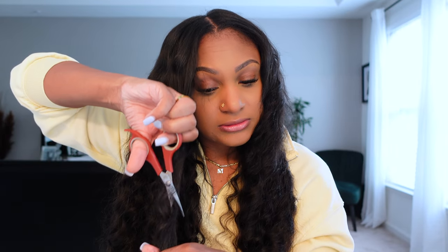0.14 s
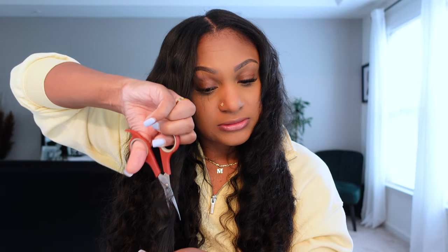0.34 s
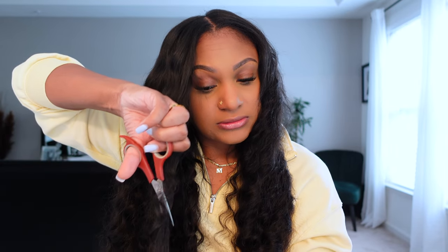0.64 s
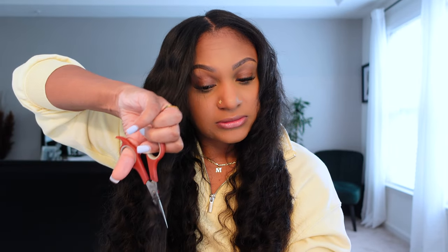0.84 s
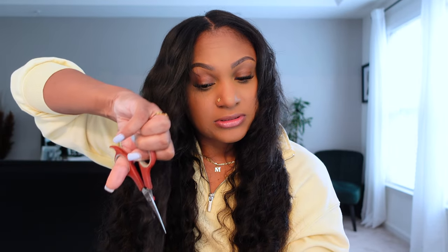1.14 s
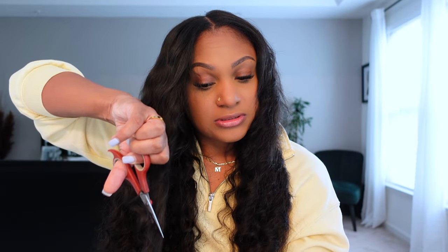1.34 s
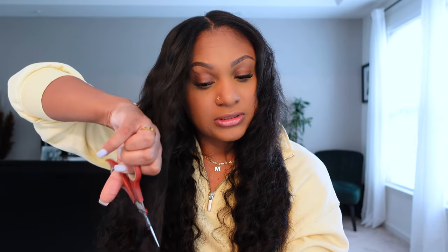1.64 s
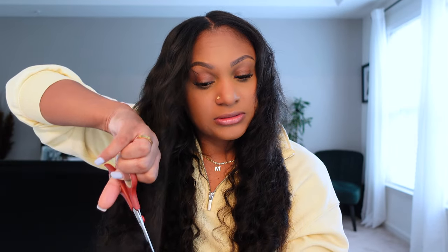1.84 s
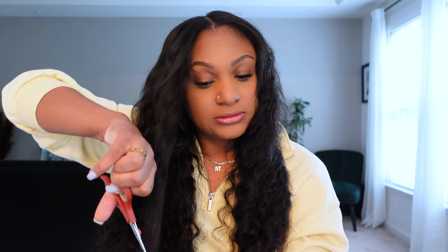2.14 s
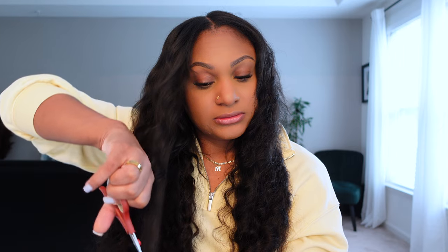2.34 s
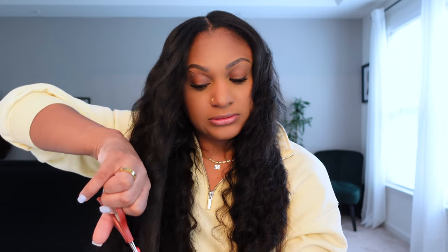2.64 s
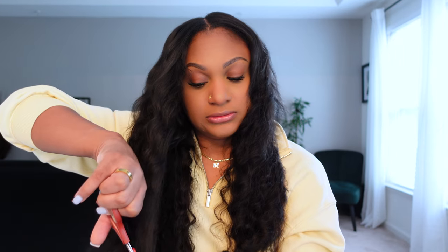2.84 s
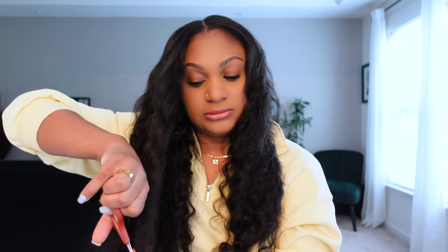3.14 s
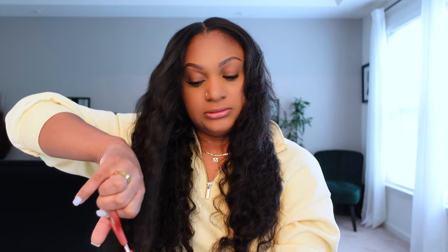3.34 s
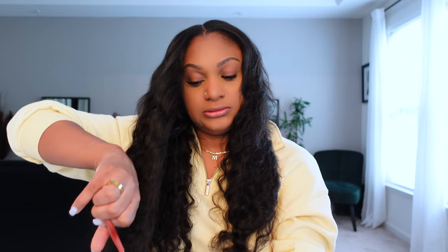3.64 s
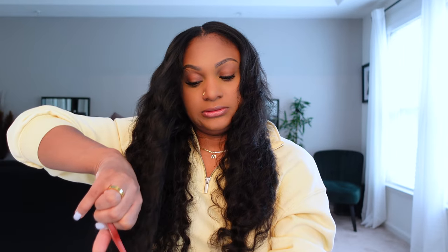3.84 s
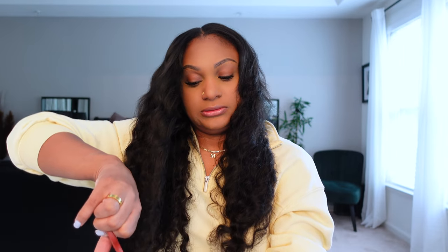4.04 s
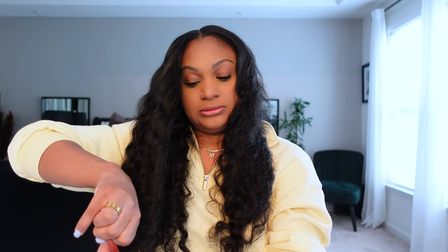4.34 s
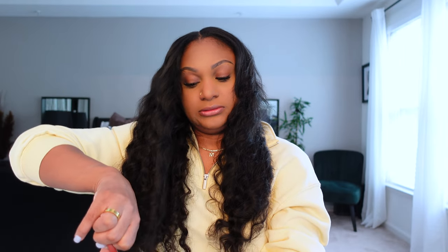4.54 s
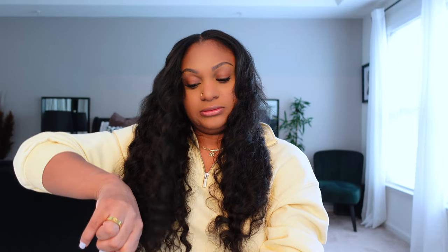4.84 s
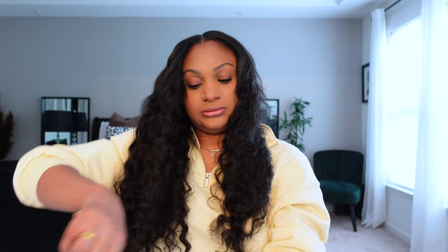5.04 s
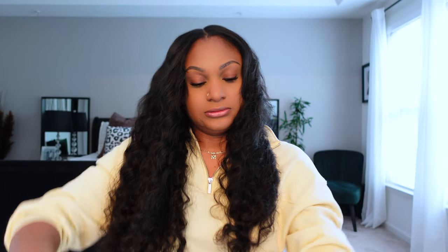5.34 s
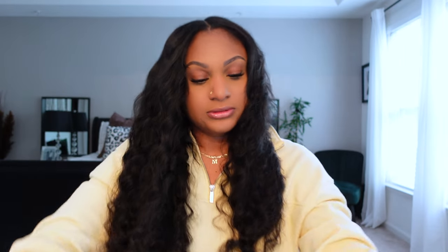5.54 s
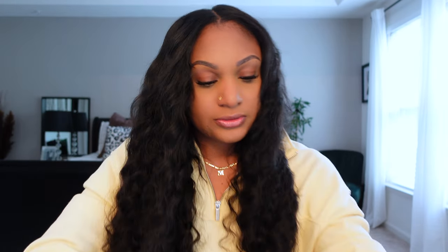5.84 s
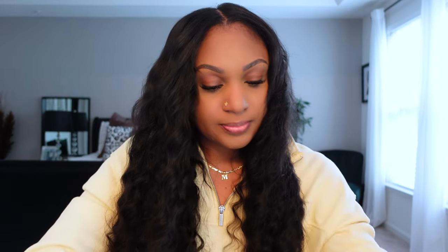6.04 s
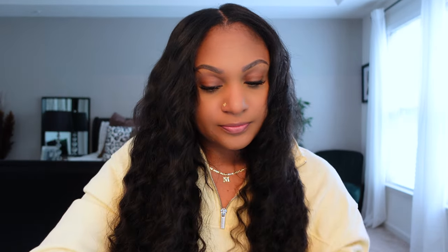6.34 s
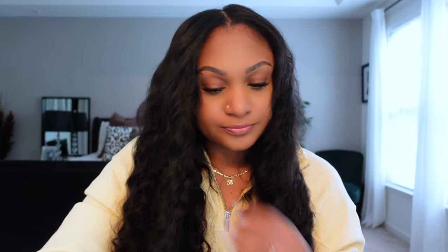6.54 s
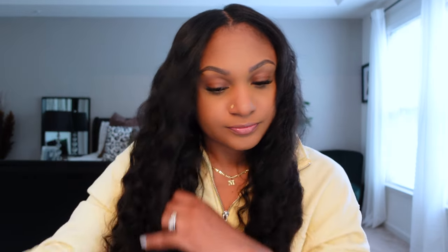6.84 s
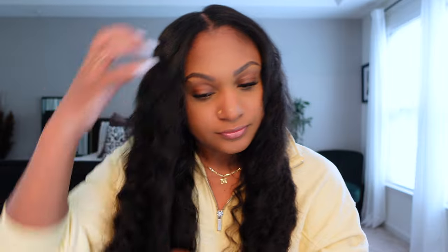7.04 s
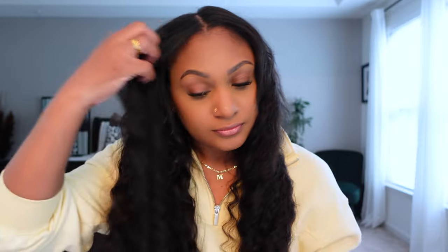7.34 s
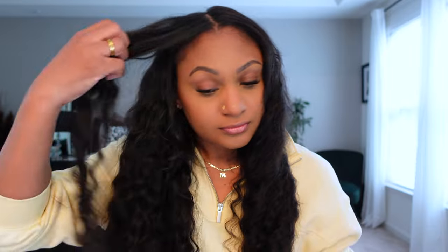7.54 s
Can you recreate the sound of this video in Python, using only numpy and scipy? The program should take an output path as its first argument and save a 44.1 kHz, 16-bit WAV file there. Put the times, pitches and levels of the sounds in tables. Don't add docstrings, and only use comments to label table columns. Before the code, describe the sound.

In a quiet, bare-walled bedroom, small scissors close about four times a second through long hair, each stroke a faint, crisp, crackling snip with thin metallic ring. After about five seconds they stop. A plastic thing scrapes over a desk, pauses, rattles in growing knocks and lands with a hard, loud clack and bounce. The camera microphone hears soft room air and hiss, with a short room ring afterwards.

```python
import sys
import numpy as np
from scipy import signal
from scipy.fft import rfft, irfft, next_fast_len
from scipy.io import wavfile
from scipy.ndimage import uniform_filter1d

SR = 44100
rng = np.random.default_rng(int(sys.argv[2]) if len(sys.argv) > 2 else 0)


def put_to_file(sound):
    columns = np.atleast_2d(sound).T
    safe = np.clip(columns, -1, 1)
    whole_steps = np.round(safe * 32767)
    wavfile.write(sys.argv[1], SR, whole_steps.astype(np.int16))


def magnitude_from_level(level_db):
    exponent = np.asarray(level_db, float) / 20
    return 10 ** exponent


N = 340011


def on_log(points, hz):
    f, v = np.transpose(points)
    return np.interp(np.log(np.maximum(hz, 1)), np.log(f), v)


def level(x, db):
    return x * magnitude_from_level(db) / np.sqrt(np.mean(x ** 2))


def add(out, start_s, sound):
    i = int(start_s * SR)
    out[i:i + len(sound)] += sound[:N - i]


def wander(per_s):
    return np.interp(np.arange(N) / SR * per_s, np.arange(100), rng.standard_normal(100))


def ring(x, modes, patchy_db, per_s):
    total = 0
    for k, (hz, width, db) in enumerate(modes):
        mode = signal.lfilter(*signal.iirpeak(hz, hz / width, SR), x)
        total = total + (-1) ** k * magnitude_from_level(db + patchy_db * wander(per_s)) * mode
    return level(total, 0)


def crackle(per_s, spread_db):
    size = magnitude_from_level(spread_db * rng.exponential(1, N).clip(0, 2))
    return (rng.random(N) < per_s / SR) * rng.choice([-1, 1], N) * size


def rattle(t, contact):
    blow = rng.standard_normal(len(t))
    for _ in range(8):
        spectrum = rfft(np.sign(blow) * np.sqrt(np.abs(blow)) * np.exp(-t / contact / 2))
        blow = irfft(spectrum / np.abs(spectrum))
    return blow * (t < 5 * contact)


def causal(db):
    cep = irfft(db * np.log(10) / 20)
    cep[1:len(cep) // 2] *= 2
    cep[len(cep) // 2 + 1:] = 0
    return irfft(np.exp(rfft(cep)))


# pitch_hz, density_db (per Hz)
AIR_COLOUR = [(15, -69.5), (25, -45), (50, -12.5), (99, -5.5), (125, -0.5), (270, 0.5), (520, -2),
              (680, -2), (770, -0.5), (900, -4.5), (2000, -8.5), (4140, -16), (7110, -19.5), (16000, -25)]
# pitch_hz, side_minus_mid_db
AIR_WIDTH = [(60, 0.5), (110, -8), (200, -4), (380, -4.5), (700, -5), (1290, -4), (2380, -5), (4400, -5),
             (8120, -7.5), (15000, -6)]


def air():
    air_db, pan_db = -65.5, 0.5
    size = next_fast_len(N)
    hz = np.arange(size // 2 + 1) * SR / size
    mid, side = rfft(rng.standard_normal((2, size))) * magnitude_from_level(on_log(AIR_COLOUR, hz))
    scale = magnitude_from_level(air_db) / np.sqrt(np.mean(irfft(mid, size) ** 2))
    side = side * magnitude_from_level(on_log(AIR_WIDTH, hz))
    both = irfft(mid + side * np.array([[1], [-1]]), size)[:, :N]
    return scale * both * magnitude_from_level(np.array([[pan_db], [-pan_db]]) / 2)


# pitch_hz, t60_s
ROOM_DECAY = [(150, 0.5), (400, 0.46), (1000, 0.56), (3000, 0.52), (7000, 0.5), (13000, 0.35)]


def walls():
    fill_s, side_db = 0.0092, -9.5
    t = np.arange(SR) / SR
    hz = np.arange(SR // 2 + 1)
    white, tail = rfft(rng.standard_normal((2, SR))), 0
    for centre in 90 * 2 ** np.arange(0, 8, .5):
        octaves = np.log2(np.maximum(hz, 1) / centre)
        band = irfft(white * np.cos(np.pi * np.clip(octaves, -.5, .5)) ** 2)
        tail = tail + band * magnitude_from_level(-60 * t / on_log(ROOM_DECAY, centre))
    tail = tail * (1 - np.exp(-t / fill_s))
    mid, side = tail / np.sqrt(np.sum(tail[0] ** 2))
    return mid + magnitude_from_level(side_db) * side * np.array([[1], [-1]])


def room(sources):
    direct = sum(x * magnitude_from_level(np.array([[pan_db], [-pan_db]]) / 2) for x, wet_db, pan_db in sources)
    sent = sum(x * magnitude_from_level(wet_db) for x, wet_db, pan_db in sources)
    return direct + signal.fftconvolve(sent[None], walls(), axes=1)[:, :N]


def thud():
    start_s, level_db, pitch_hz, fade_s = 6.824, -69, 30, 0.012
    t = np.maximum(np.arange(N) / SR - start_s, 0)
    return magnitude_from_level(level_db) * np.sin(2 * np.pi * pitch_hz * t) * np.exp(-t / fade_s)


def knocks(table, slope, rings):
    out, hz, t = np.zeros(N), np.arange(1025) * SR / 2048, np.arange(1024) / SR
    colour = on_log(slope, hz)
    for f, width, db in rings:
        colour = colour + db / (1 + (2 * (hz - f) / width) ** 2)
    for start_s, peak_db, thud_db, edge_db, contact_s in table:
        bright_db = 0.55 * edge_db
        tilt = on_log([(900, thud_db), (1500, 0.005), (3200, 0.0054),
                       (5600, bright_db), (6600, bright_db), (9000, edge_db)], hz)
        knock = np.convolve(rattle(t, max(contact_s, .0005)), causal(colour + tilt))
        add(out, start_s, knock * magnitude_from_level(peak_db) / np.abs(knock).max())
    return out


# start_s, peak_db, thud_db, edge_db, contact_s
LIGHT_KNOCKS = [
    (5.763, -45, 23, 12, 0.0027),
    (6.448, -39, 4, -32, 0.0021),
    (6.55, -40, 12, -40, 0.0019),
    (6.559, -30, -3.5, -14, 0.0032),
    (6.697, -22.5, 1, 4, 0.0043),
]
LIGHT_ECHOES = [(6.729, -33, 0, 4, .003), (6.756, -30, -4, -6, .003)]
# pitch_hz, density_db (per Hz)
LIGHT_SLOPE = [(70, -36.5), (330, -11), (1250, -9), (1950, -10.5), (2900, -1), (3800, -9), (5000, -12),
               (6000, -7), (7000, -27), (7800, -34.5), (8500, -24.5), (9600, -36), (10700, -20.5),
               (13000, -40)]
# pitch_hz, width_hz, level_db
LIGHT_MODES = [(720, 180, 6.6), (1670, 180, 14.3), (2262, 130, 9.9), (2635, 80, 3.5), (3000, 120, 2.3),
               (4400, 150, 5.5)]


def light_knocks(table):
    return knocks(table, LIGHT_SLOPE, LIGHT_MODES)


# start_s, peak_db, thud_db, edge_db, contact_s
CLACK_BLOWS = [
    (6.8232, -17, 3, -3, .0012),
    (6.8254, -4.5, 0, 0, .0035),
    (6.879, -10, -2, 4, .003),
]
CLACK_WALLS = [(6.8415, -16, 0, 3, .002), (6.852, -19, 0, 6, .002), (6.905, -21, 0, 6, .002)]
# pitch_hz, density_db (per Hz)
CLACK_SLOPE = [(70, -44), (450, -14.5), (1100, -19.5), (1500, -7), (2000, -9.5), (2600, -1.5), (3150, -5),
               (3800, -14.5), (4500, -6), (6100, -11.5), (7500, -16.5), (8700, -24.5), (12500, -30.5),
               (16000, -48.5)]
# pitch_hz, width_hz, level_db
CLACK_MODES = [(1702, 90, 4.5), (2636, 36, 8.3), (2980, 50, 7), (3025, 45, 8.3), (4440, 200, 4.9),
               (5290, 80, 1.4)]


def clack(table):
    return knocks(table, CLACK_SLOPE, CLACK_MODES)


# start_s, pressure_db, lean_on_shell_db
DRAG_PATH = [(5.762, -49, -13.5), (5.79, -51.5, -8), (5.94, -56, 0), (6.0, -51.5, -5), (6.04, -65, 2),
             (6.13, -50, -4), (6.172, -53, 6.5), (6.215, -65, 1), (6.3, -80, -3)]
LAST_SCRAPE = [
    (6.3, -80, -3),
    (6.32, -54, -9.5),
    (6.368, -67, 11),
    (6.435, -77, -3),
]


def pressure():
    rim_db, squeak_db, fresh_db, fresh_fade_s = -5, -12, 21, 0.072
    t, gain = np.arange(N) / SR, 0
    fresh = fresh_db * np.exp(-np.maximum(t - DRAG_PATH[0][0], 0) / fresh_fade_s)
    for table in (DRAG_PATH, LAST_SCRAPE):
        s, db, lean = np.transpose(table)
        desk = np.interp(t, s, db, -200, -200)
        shell = desk + np.interp(t, s, lean)
        gain = gain + magnitude_from_level(np.array([shell, desk, shell + rim_db, shell + squeak_db + fresh]))
    return gain


# pitch_hz, width_hz, level_db
SHELL_MODES = [(3040, 120, 6), (2770, 200, -0.5), (3360, 300, -8)]
DESK_MODES = [(280, 95, -8.5), (388, 60, -3.5), (616, 64, 4.5), (807, 120, -1.5), (1270, 210, -12.5)]
RIM_MODES = [(4230, 220, -5.5), (3700, 300, -11.5)]
SQUEAK_MODES = [(5220, 220, 4), (5790, 350, 1.5)]


def drag():
    drive = level(crackle(per_s=540, spread_db=5.5), 0) + magnitude_from_level(-2) * rng.standard_normal(N)
    out = 0
    for gain, modes in zip(pressure(), (SHELL_MODES, DESK_MODES, RIM_MODES, SQUEAK_MODES)):
        out = out + magnitude_from_level(-6.0) * gain * ring(drive, modes, patchy_db=1.8, per_s=8)
    return signal.sosfilt(signal.butter(2, 210, "high", fs=SR, output="sos"), out)


# start_s, peak_db, pitch_hz
SINGLE_TICKS = [(.2084, -58, 9000), (.4569, -56, 10000), (.946, -60, 9050), (.9644, -57, 9000),
                (1.1994, -60, 7000), (1.2112, -54, 8000), (1.5334, -62, 4050), (1.88, -57, 5000),
                (2.0805, -46, 2310), (2.2997, -51, 6660), (2.5665, -57.5, 7000), (2.6685, -52, 4000),
                (2.7794, -65, 2540), (3.4392, -50, 6900), (3.7217, -52.5, 7160), (3.817, -60, 7850),
                (4.0094, -59, 5000), (4.3894, -54, 7600), (4.783, -47.5, 7500), (4.843, -53, 2450),
                (4.8702, -52, 4660), (4.872, -54, 3600), (4.8716, -62, 2500), (4.891, -55, 646),
                (3.5198, -51, 3620), (6.126, -48, 4300), (6.34, -58.5, 5330), (6.567, -62, 8900),
                (7.052, -46, 12000), (7.3744, -55, 6000)]


def ticks():
    out, t = np.zeros(N), np.arange(512) / SR
    for start_s, peak_db, pitch_hz in SINGLE_TICKS:
        peak = signal.iirpeak(pitch_hz, 1.8, SR)
        tick = signal.lfilter(*peak, signal.lfilter(*peak, rattle(t, contact=.0008)))
        add(out, start_s, tick * magnitude_from_level(peak_db) / np.abs(tick).max())
    return out


# bite_s, closing_s, level_db, thin_blade_ring_db, mid_blade_ring_db
CLOSING_STROKES = [(-.01, .056, -62, 3, -13), (.252, 0.033, -62.5, 8, -7), (.48, 0.032, -63, 4, -15),
                   (.735, 0.027, -65.5, 1.5, -8), (0.976, 0.048, -62.5, -5, -20),
                   (1.236, 0.059, -65, -4, -11), (1.545, 0.028, -60.5, -7.5, -18),
                   (1.822, 0.03, -56, -7, -6.5), (2.082, .024, -59, -9.5, -4),
                   (2.335, 0.028, -63.5, -11.5, -3.5), (2.61, 0.053, -65.5, -6.5, -4.5),
                   (2.912, .04, -60.5, -8, -3.5), (3.182, 0.048, -60.5, -6, -0.5),
                   (3.492, 0.038, -56.5, -11, -6), (3.765, 0.044, -61.5, -12.5, 1),
                   (4.069, 0.033, -61, -9, 0.5), (4.328, .036, -61.5, -12, -1),
                   (4.566, 0.049, -62, -16, 1.5), (4.8, 0.042, -71, -15, -2)]
BITE_LEVEL = [-4, -11, -3.5, -6]
LINGER_LEVEL = [0.1, 4, 1.5, 1.5]


def strokes():
    approach_s, shut_s, faint_db = 0.04, 0.04, -24
    t, gain = np.arange(N) / SR, 0
    for bite_s, closing_s, level_db, thin_db, mid_db in CLOSING_STROKES:
        times = bite_s + np.cumsum([-approach_s, approach_s, closing_s, shut_s])
        tip_db = -4.5 + .6 * thin_db
        parts = []
        for part_db, bite, linger in zip((0, mid_db, thin_db, tip_db), BITE_LEVEL, LINGER_LEVEL):
            course = level_db + part_db + np.array([faint_db, bite, 0, faint_db + linger])
            parts.append(np.interp(t, times, course, -200, -200))
        gain = gain + magnitude_from_level(parts)
    return gain


# pitch_hz, width_hz, level_db
BLADE_BODY = [(1670, 530, -5.5), (2250, 280, -1.5), (3380, 1070, -0.5), (4083, 480, 3.5), (5530, 540, -15)]
BLADE_MIDDLE = [(6340, 610, -6), (6920, 650, -1), (7500, 450, -2)]
BLADE_EDGE = [(9530, 480, -2), (10000, 550, 0), (10820, 740, 1), (11350, 570, 0.4), (12000, 780, -4)]
BLADE_TIP = [(12460, 760, 2), (13400, 600, 4), (13900, 800, 5), (14700, 800, -20)]


def scissors():
    shared, out = crackle(per_s=700, spread_db=6), 0
    for gain, modes in zip(strokes(), (BLADE_BODY, BLADE_MIDDLE, BLADE_EDGE, BLADE_TIP)):
        snaps = level(shared + crackle(per_s=900, spread_db=5), 0)
        drive = snaps + magnitude_from_level(-6) * rng.standard_normal(N)
        out = out + magnitude_from_level(0.5) * gain * ring(drive, modes, patchy_db=2.5, per_s=6.945)
    span = int(.007 * SR)
    density = uniform_filter1d(uniform_filter1d(np.abs(shared), span), span)
    return out * level((density + 0.0017) ** .3, 0) + ticks()


def scene():
    echoes = light_knocks(LIGHT_ECHOES) + clack(CLACK_WALLS)
    sources = [(scissors(), -12, .8), (drag(), -1.5, 1.8),
               (light_knocks(LIGHT_KNOCKS), 2.5, .4), (clack(CLACK_BLOWS), -.6, -1.2)]
    return room(sources) + echoes + thud() + air()


def roll_off(x):
    return signal.sosfilt(signal.butter(12, 16480, fs=SR, output="sos"), x)


def record(dry):
    top_hz, end_s = 15650, 7.706
    cut = signal.sosfilt(signal.ellip(10, .1, 60, top_hz, fs=SR, output="sos"), dry)
    mix = cut * (np.arange(N) < end_s * SR)
    return roll_off(mix)


dry = scene()
out = record(dry)
put_to_file(out)
```